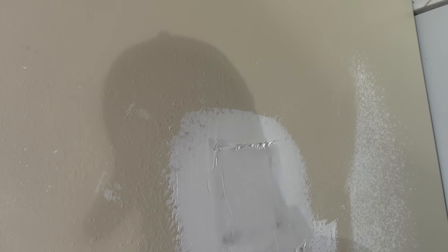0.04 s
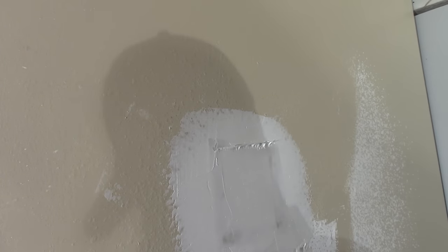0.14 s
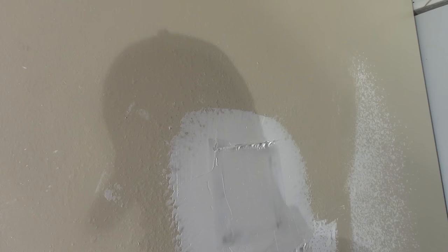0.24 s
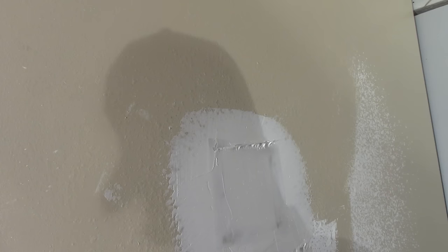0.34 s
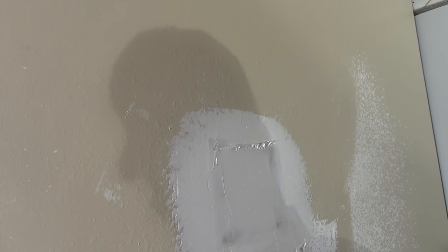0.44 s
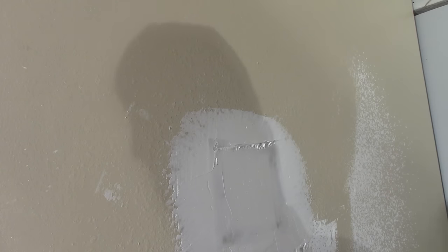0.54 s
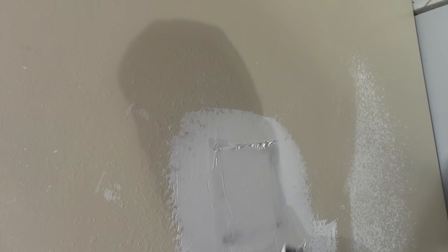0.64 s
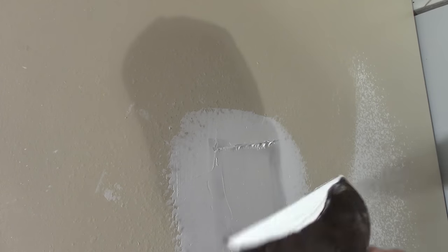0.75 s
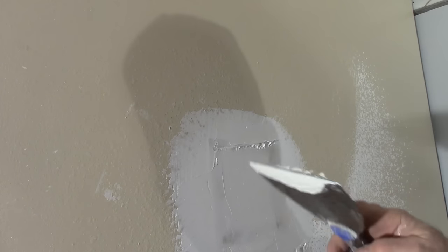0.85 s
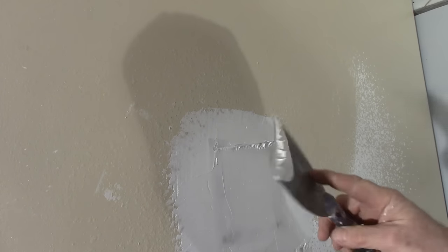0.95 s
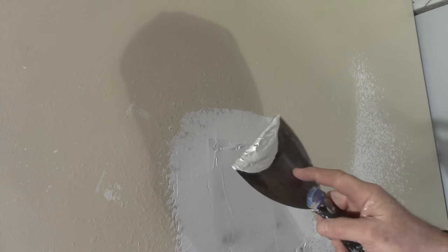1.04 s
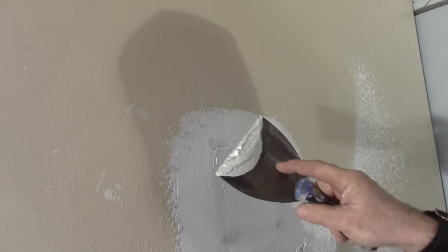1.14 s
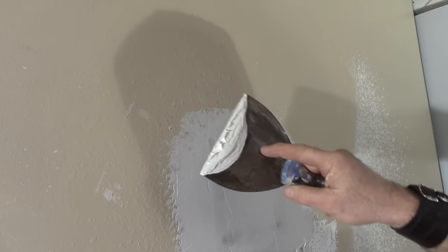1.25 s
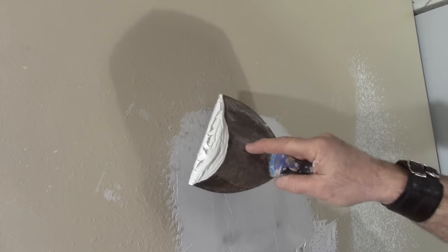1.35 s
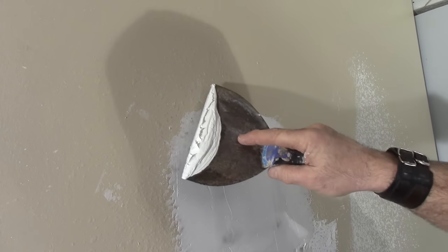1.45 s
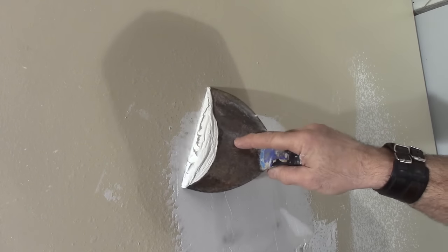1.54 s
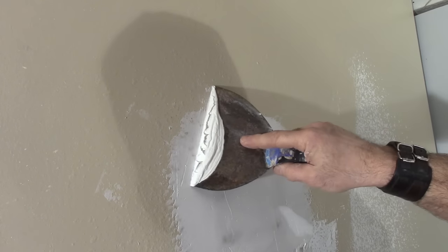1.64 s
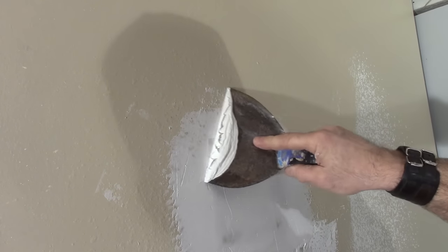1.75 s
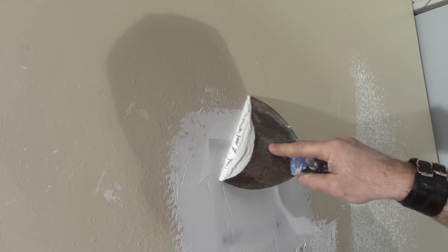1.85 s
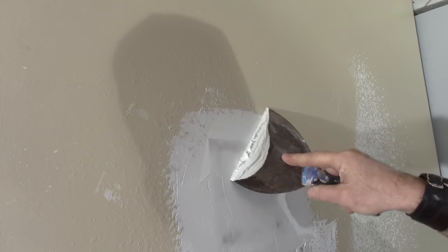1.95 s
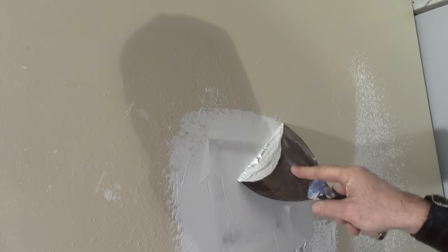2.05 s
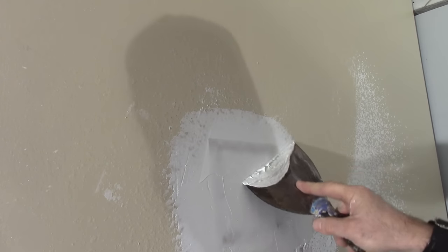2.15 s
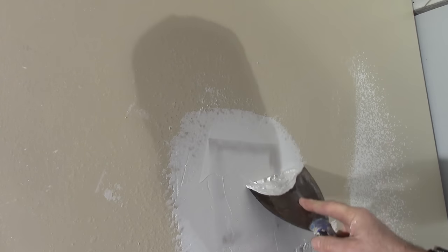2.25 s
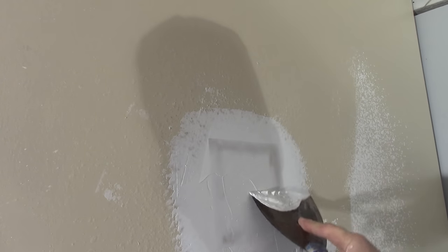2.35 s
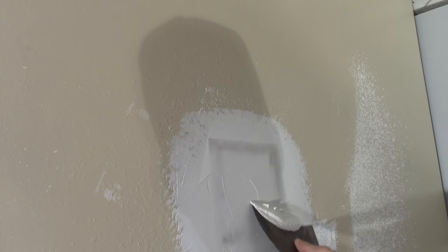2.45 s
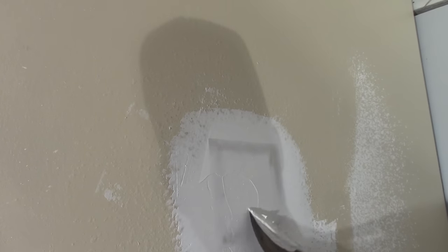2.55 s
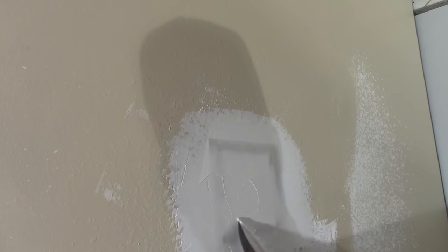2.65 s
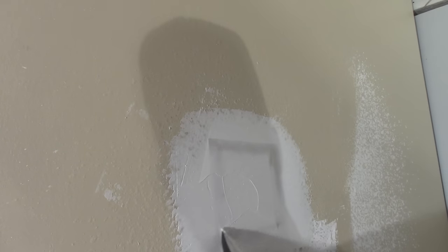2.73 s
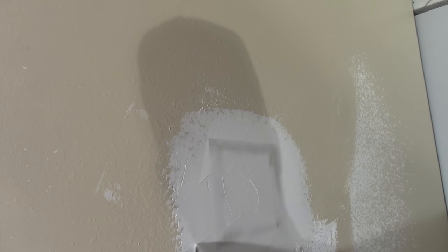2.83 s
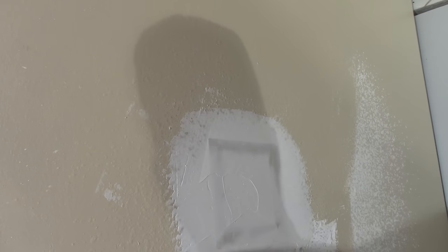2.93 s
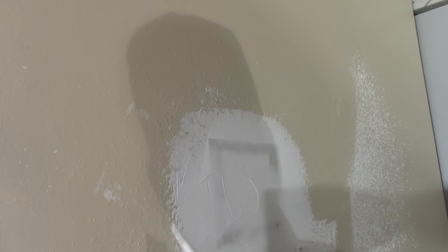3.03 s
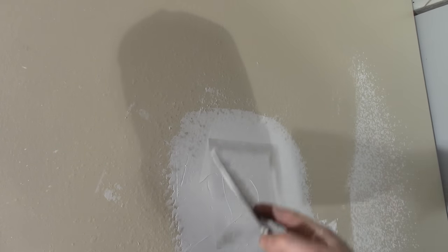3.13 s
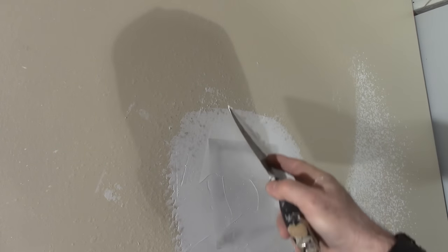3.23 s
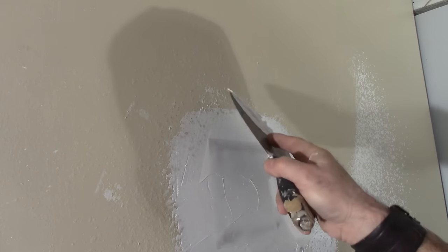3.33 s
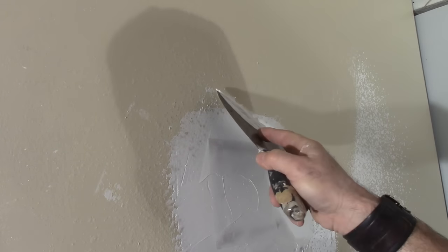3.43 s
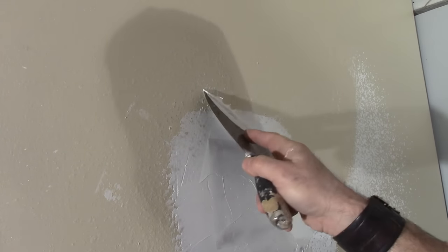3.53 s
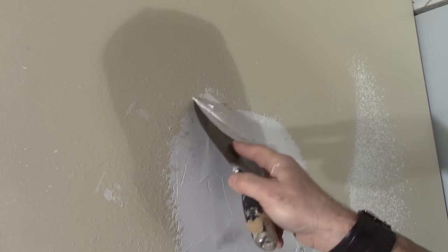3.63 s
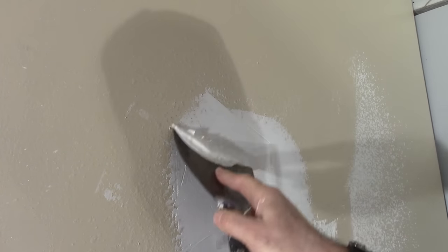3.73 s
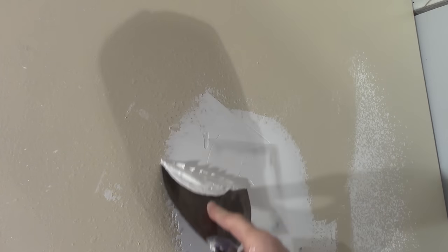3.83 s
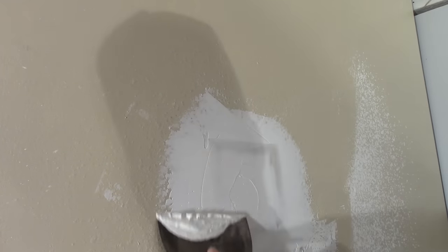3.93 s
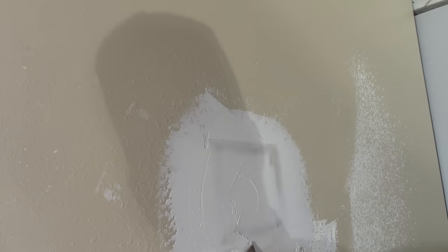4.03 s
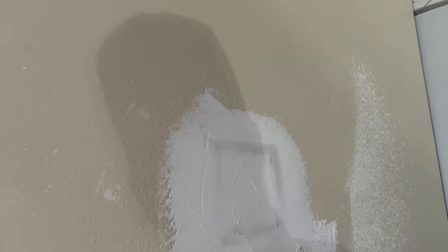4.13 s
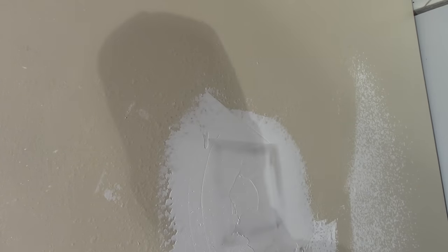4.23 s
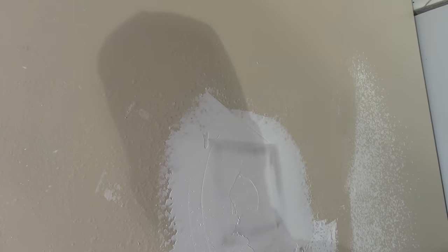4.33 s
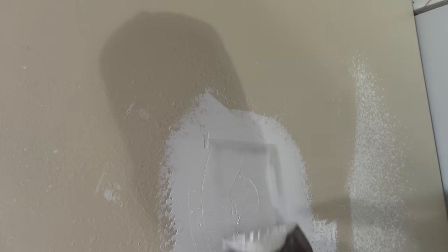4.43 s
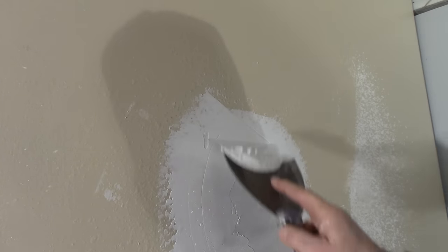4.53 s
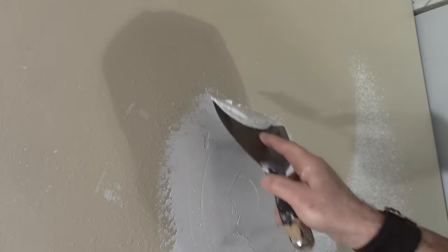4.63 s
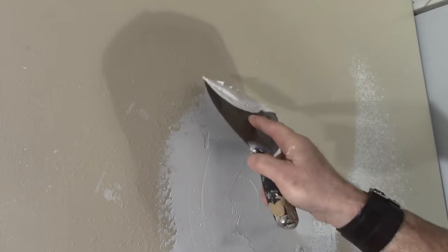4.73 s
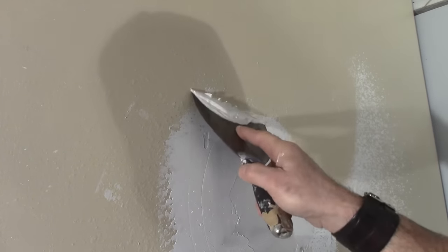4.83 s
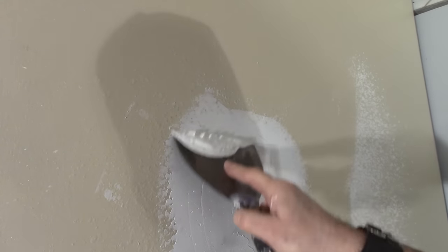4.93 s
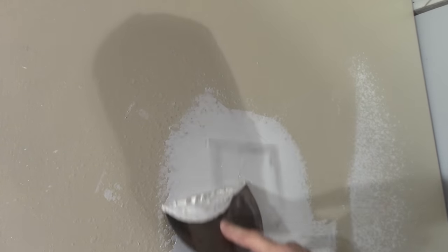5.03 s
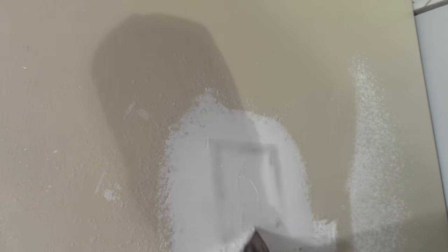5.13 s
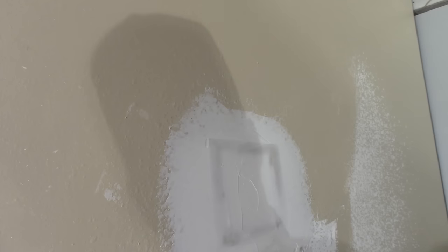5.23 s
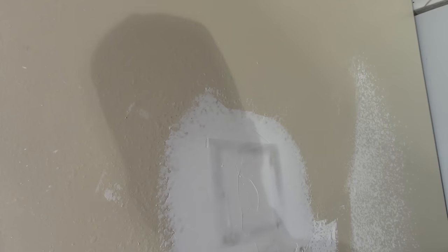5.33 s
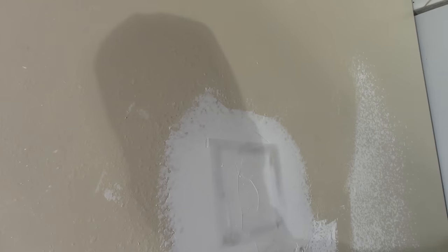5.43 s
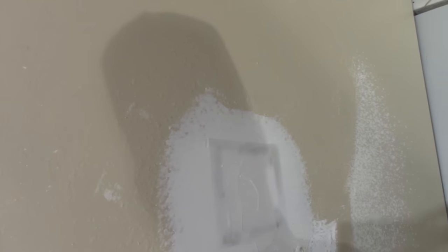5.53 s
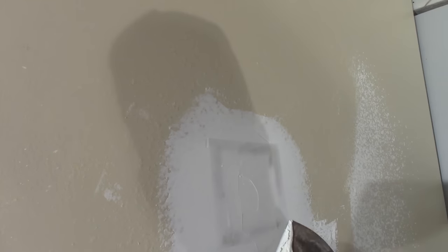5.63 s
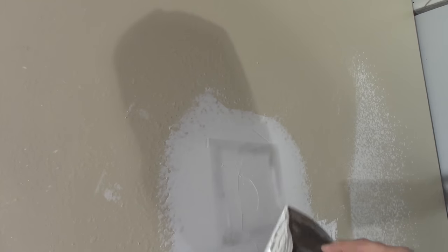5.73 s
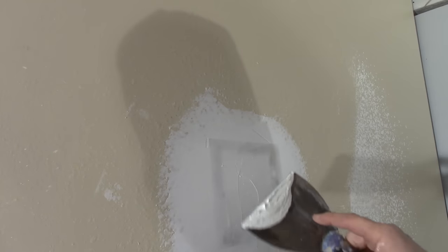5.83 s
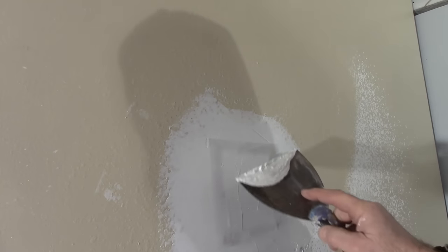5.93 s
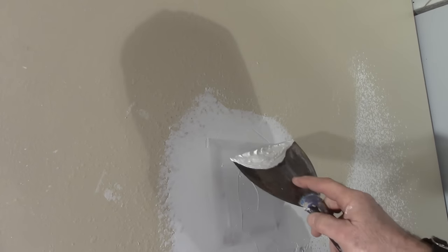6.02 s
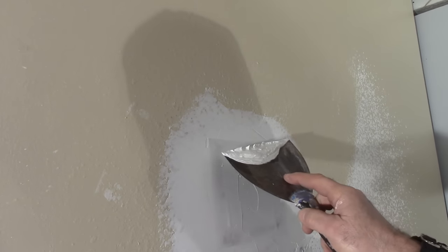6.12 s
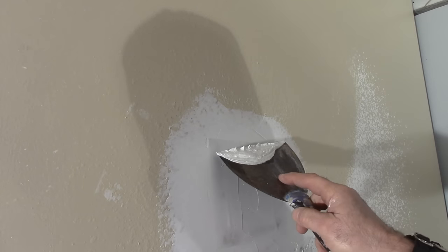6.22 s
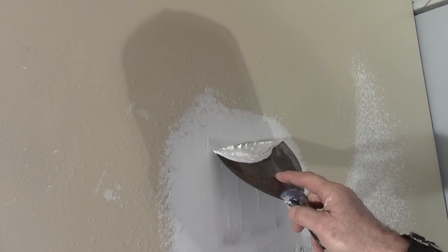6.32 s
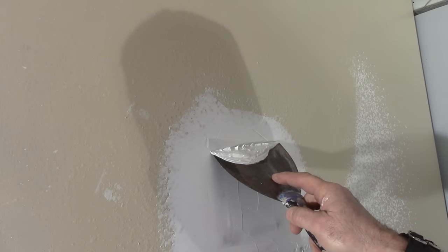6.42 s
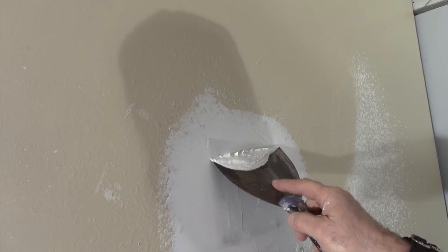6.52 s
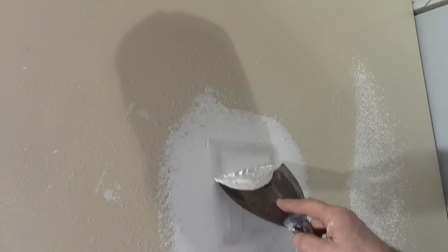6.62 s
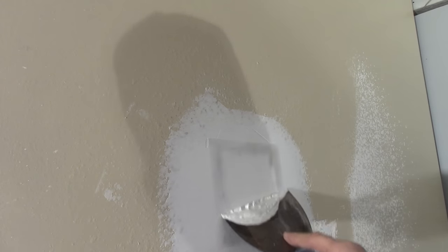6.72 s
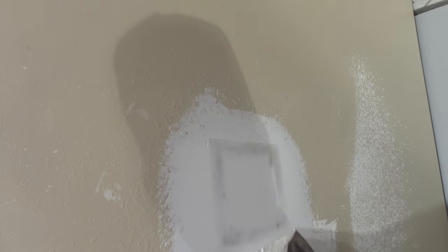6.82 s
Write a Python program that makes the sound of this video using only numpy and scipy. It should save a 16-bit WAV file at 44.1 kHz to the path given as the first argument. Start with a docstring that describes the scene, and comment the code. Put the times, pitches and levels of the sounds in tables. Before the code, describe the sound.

In a bare, lively room, a broad metal filling knife works on a hollow wall board close to the microphone. Quiet tub rubbing leads to a dull landing and several short hissing, ringing scrapes. After a pause, a double knock starts a second group with a thin high squeak; after another, a sharp slap opens a short, harsh final group. Soft wiping and a muffled touch follow, with sound almost centred.

```python
"""A soft wipe and a hollow rub in a tub of filler open the take, over low room noise in a bare room.
Then a wide steel putty knife lands on a hollow plasterboard wall with a knock, for three spells of work:
noise grains hiss through the paste and make the steel sing, and denser ones rasp on the board under pressure.
The edge ticks on grit through the blade's resonances and squeaks in wavering tones; a last soft touch follows.
The microphone is close and nearly mono; filtered noise makes the reverberation and the room noise."""
import sys
import numpy as np
from scipy import signal
from scipy.fft import rfft, irfft, next_fast_len
from scipy.io import wavfile

SR = 44100
rng = np.random.default_rng(int(sys.argv[2]) if len(sys.argv) > 2 else 0)


def wrap_up_sound(samples):
    """Save the sound to the file named by the first command line argument, as 16-bit audio."""
    columns = np.atleast_2d(samples).T
    # keep every value between -1 and 1, then stretch to whole-number steps
    tamed = np.clip(columns, -1, 1)
    steps = np.round(tamed * 32767).astype(np.int16)
    wavfile.write(sys.argv[1], SR, steps)


N = 302967
TIME = np.arange(N) / SR

# modes of the hollow wall board: [f/Hz, relative level/dB, t60/s]
BOARD_MODES = [(60, -23, 0.35), (124.3, -12, 0.14), (184.4, -5.5, 0.057), (252, -12, 0.14),
               (344, -5, 0.054), (402, -3, 0.11), (467, 0.5, 0.039), (544, 1.5, 0.023), (728, -0.5, 0.021),
               (820, 2, 0.014), (1002, -7, 0.028)]


def from_db(db):
    """Decibels to gain."""
    return 10 ** (np.asarray(db) / 20)


def rms_one(x):
    """Scale to unit power."""
    return x / np.sqrt(np.mean(x ** 2) + 1e-20)


def at_hz(points, hz):
    """Read a table on a log-frequency axis."""
    freqs, values = np.transpose(points)
    return np.interp(np.log(np.maximum(hz, 1)), np.log(freqs), values)


def colour(x, spectrum):
    """Give a steady signal a smooth spectrum; rms 1."""
    size = next_fast_len(N)
    bins = rfft(x, size)
    hz = np.arange(len(bins)) * SR / size
    return rms_one(irfft(bins * from_db(at_hz(spectrum, hz)), size)[:N])


def drift(rate):
    """Slow chance with spread 1: noise through two equal one-pole low-passes at the rate in Hz."""
    r = np.exp(-2 * np.pi * rate / SR)
    noise = rng.standard_normal(N + SR)
    # the first second lets the filter settle
    return rms_one(signal.lfilter([1], [1, -2 * r, r * r], noise)[SR:])


def low_pass(x, hz):
    """Gentle second-order roll-off."""
    return signal.sosfilt(signal.butter(2, min(hz, SR / 2 - 1), fs=SR, output="sos"), x + 1e-18)


def high_pass(x, hz):
    """Second-order cut of the bass."""
    return signal.sosfilt(signal.butter(2, hz, "high", fs=SR, output="sos"), x)


def band_pass(x, low, high):
    """Keep what lies between two frequencies in Hz."""
    return signal.sosfilt(signal.butter(2, [low, high], "band", fs=SR, output="sos"), x)


def ring(x, hz, t60):
    """A unit click sets a decaying sine of starting height 1 ringing."""
    r, w = np.exp(-np.log(1000) / (t60 * SR)), 2 * np.pi * hz / SR
    return signal.lfilter([0, np.sin(w)], [1, -2 * r * np.cos(w), r * r], x + 1e-18)


def resonate(x, hz, width):
    """One resonance of the given width in Hz, with gain 1 on top."""
    r = np.exp(-np.pi * width / SR)
    forward = np.array([1, 0, -1]) * (1 - r * r) / 2
    feedback = [1, -2 * r * np.cos(2 * np.pi * hz / SR), r * r]
    return signal.lfilter(forward, feedback, x + 1e-18)


def burst(start, decay_s):
    """Envelope that jumps to 1 and dies away."""
    return (TIME >= start) * np.exp(-np.minimum(np.abs(TIME - start) / decay_s, 20))


def gesture(start, end, attack_s, release_s):
    """Envelope that swells to 1 at the start, holds, and dies away after the end."""
    outside = np.maximum(start - TIME, 0) / attack_s + np.maximum(TIME - end, 0) / release_s
    return np.exp(-np.minimum(outside, 20))


def gestures(rows, attack_s, release_s, axis=2):
    """Gain over time of a table of like gestures, from one of its dB columns."""
    return sum(from_db(row[axis]) * gesture(row[0], row[1], attack_s, release_s) for row in rows)


def slide_gain(axis=2):
    """Strength of the sliding contact over time: hiss from column 2, singing from column 3."""
    # the blade slides through the paste:
    # [start t/s, end t/s, relative hiss level/dB, relative level of the singing steel/dB]
    slide_times = [(1.685, 1.75, -50.5, -32.5), (1.775, 1.985, -47, -32.5), (2.02, 2.10, -52, -51),
                   (2.14, 2.49, -58.5, -55), (2.245, 2.33, -68, -39), (2.60, 2.67, -55.5, -62),
                   (2.72, 2.955, -44, -32), (3.695, 3.795, -45.5, -35), (3.90, 4.15, -50, -35.5),
                   (4.19, 4.31, -44, -25.5), (4.91, 4.99, -45.5, -41), (5.05, 5.25, -47.5, -34),
                   (5.29, 5.355, -39, -23)]
    return gestures(slide_times, attack_s=0.019, release_s=0.017, axis=axis)


def pressure(release_s=0.03):
    """Each press of the hand builds at its own pace and lets go alike."""
    # the edge is pressed onto the board:
    # [full pressure from t/s, until t/s, swell time constant/s, relative rasp level/dB]
    press_times = [(1.948, 2.068, 0.074, -36), (2.707, 2.734, 0.035, -29), (2.794, 2.804, 0.0083, -23),
                   (2.928, 2.972, 0.057, -25.5), (3.763, 3.808, 0.015, -34.5), (4.281, 4.319, 0.059, -18),
                   (4.857, 4.95, 0.011, -21.5), (5.319, 5.356, 0.031, -13)]
    return sum(from_db(db) * gesture(start, end, swell_s, release_s)
               for start, end, swell_s, db in press_times)


def grit(per_s, spread_db, judder_db, judder_rate):
    """Tiny slips of random size and sign at random moments; the judder of the edge swells and fades them."""
    signs = np.sign(rng.standard_normal(N))
    sizes = from_db(spread_db * (2 * rng.random(N) - 1)) * signs
    happens = rng.random(N) < per_s / SR
    return sizes * happens * from_db(judder_db * np.tanh(drift(judder_rate)))


def blade(x, wander_db=4, wander_rate=9):
    """The steel's damped resonances; each swells and fades a little as the point of contact shifts."""
    # resonances of the steel blade: [f/Hz, width/Hz, relative level/dB]
    steel_modes = [(1270, 74, -3), (2255, 110, -3.5), (2700, 560, 0), (3250, 210, -3.5), (3690, 260, -2.5),
                   (4200, 130, -3), (4680, 103, -15), (7140, 300, -15), (2750, 40, 0), (3660, 70, -13),
                   (4900, 54, 0.5)]
    out = np.zeros(N)
    for hz, width, db in steel_modes:
        wander = wander_db * np.tanh(drift(wander_rate))
        out += from_db(db + wander) * resonate(x, hz, width)
    return out


def sliding(slide, press, steel_db=-5, stroke_db=11, unsteady_db=-1.0, unsteady_rate=14):
    """Fine grains in the paste pass under the blade and make it sing."""
    # hiss of the wet paste: [f/Hz, relative density level/dB]
    hiss_spectrum = [(59, -49), (100, -14.5), (249, -1.5), (364, -0.5), (511, -0.5), (732, -5), (905, -0.5),
                     (1140, -9), (1300, -3), (2350, -8.5), (2720, -6), (3030, -8), (3300, -8.5),
                     (10100, -23.5), (15800, -35)]
    # light wiping of the paste: [start t/s, end t/s, hiss level/dB]
    wipe_times = [(.39, .52, -55), (.79, .81, -46.5), (.91, 1.25, -53.5), (1.06, 1.10, -50),
                  (5.735, 5.75, -51), (6.60, 6.71, -46.5), (6.86, 6.87, -42.5)]
    # pressure also raises the hiss and the singing
    press_hiss_db, press_singing_db = -29, -15
    slips = grit(per_s=4000, spread_db=5.5, judder_db=4.0, judder_rate=49)
    strokes = from_db(stroke_db) * (slide + from_db(press_hiss_db) * press)
    wipes = gestures(wipe_times, attack_s=0.024, release_s=0.039)
    hiss = colour(slips, hiss_spectrum) * (strokes + wipes)
    singing_gain = from_db(steel_db) * (slide_gain(axis=3) + from_db(press_singing_db) * press)
    singing = rms_one(blade(slips)) * singing_gain
    return (hiss + singing) * from_db(unsteady_db * np.tanh(drift(unsteady_rate)))


def rasping(slide, press, rasp_db=-1, board_db=-15, slide_rasp_db=2):
    """Under pressure the bare edge stutters densely over the wall and shakes the board; slides rasp too."""
    # rasp of the edge on the board: [f/Hz, relative density level/dB]
    rasp_spectrum = [(50, -43), (90, -32), (140, -13.5), (280, -6), (420, 0.5), (650, -9), (950, 0),
                     (1800, 5), (2300, -1), (3000, -1), (4800, -7), (6000, -17), (9000, -44), (15800, -51)]
    slips = grit(per_s=12000, spread_db=5, judder_db=4.5, judder_rate=84)
    board = np.zeros(N)
    for hz, db, t60 in BOARD_MODES:
        width = np.log(1000) / (np.pi * t60)
        board += from_db(db) * resonate(slips, hz, width)
    voice = colour(slips, rasp_spectrum) + from_db(board_db) * rms_one(board)
    return from_db(rasp_db) * voice * np.hypot(press, from_db(slide_rasp_db) * slide)


def landings(slap_s=0.013, push_s=0.012, rattle_db=-25, knock_db=19, ring_db=-5):
    """The blade claps flat on the wall, and the hollow board knocks and thuds."""
    # blade meets wall: [t/s, relative thud level/dB, relative slap level/dB, low-pass of the contact f/Hz]
    landing_times = [(0.789, -34, -48, 5000), (1.579, -18.5, -29.5, 2030), (2.029, -29, -20.5, 1430),
                     (2.941, -20.5, -37, 298), (3.551, -23, -31.5, 3520), (3.573, -15.5, -24, 1490),
                     (4.8245, -11, -1.5, 6200), (6.453, -22, -28, 600)]
    # slap of the flat steel: [f/Hz, relative density level/dB]
    slap_spectrum = [(30, -47), (70, -28), (130, -28), (280, -26), (430, -2.5), (800, 0), (1200, -8.5),
                     (1800, 0), (2600, -2.5), (4400, -10.5), (6000, -18), (9000, -21), (15800, -16)]
    # after each landing the blade settles flat with a duller push
    settle_s, settle_db, settle_hz = 0.021, -2.5, 220
    clap = colour(rng.standard_normal(N), slap_spectrum)
    rattle = from_db(rattle_db) * rng.standard_normal(N)
    slaps, pushes = np.zeros(N), np.zeros(N)

    def push(s):
        """A click with a short rattle after it."""
        return signal.unit_impulse(N, round(s * SR)) + rattle * burst(s, push_s)

    for s, thud_db, slap_db, bright_hz in landing_times:
        # a soft contact passes only the lows
        pushes += from_db(thud_db) * low_pass(push(s), bright_hz)
        pushes += from_db(thud_db + settle_db) * low_pass(push(s + settle_s), settle_hz)
        slaps += from_db(slap_db) * low_pass(clap * burst(s, slap_s), bright_hz)
    knock = from_db(knock_db) * resonate(pushes, hz=600, width=1300)
    thud = np.zeros(N)
    for k, (hz, db, t60) in enumerate(BOARD_MODES):
        # neighbouring modes move in opposite senses
        thud += (-1) ** k * from_db(db) * ring(pushes, hz, t60)
    # the board radiates the deep bass poorly
    return slaps + high_pass(knock + from_db(ring_db) * thud, 80)


def catches(slide, catch_db=-5, crack_db=-2, decay_s=0.002):
    """A grain snaps free: a crack, and the blade rings."""
    # the edge catches on coarse grit: [t/s, relative level/dB]
    catch_times = [(0.7893, -32.5), (1.82, -21.5), (1.868, -29), (1.934, -27), (1.954, -29), (1.9865, -30),
                   (2.2513, -37), (2.4922, -45), (2.59, -31.5), (2.6377, -37), (2.7911, -34), (2.943, -25),
                   (3.684, -38), (4.098, -23), (4.99, -20.5), (5.1244, -23), (5.2415, -29)]
    # finer grit comes by chance during a slide; its level is against the slide gain
    grit_per_s, grit_db, grit_spread_db = 26, 10.5, 5
    happens = rng.random(N) < grit_per_s / SR
    grains = happens * slide * from_db(grit_db + grit_spread_db * rng.uniform(-1, 1, N))
    fine = signal.lfilter([1], [1, -np.exp(-1 / (decay_s * SR))], grains + 1e-18)
    coarse = sum(from_db(db) * burst(s, decay_s) for s, db in catch_times)
    snaps = rng.standard_normal(N) * (fine + coarse)
    return from_db(catch_db) * (4 * blade(snaps) + from_db(crack_db) * low_pass(snaps, hz=8650))


def squeaks(waver=0.043, rough_db=4, waver_rate=236, rough_rate=160):
    """Stick and slip lock onto one resonance for a moment: a rough, wavering tone."""
    # the edge sticks and squeaks briefly: [centre t/s, half length/s, mean f/Hz, level/dB before roughness]
    squeak_times = [(2.373, 0.025, 1382, -38), (2.54, 0.016, 1110, -38), (2.795, 0.014, 1400, -25.5),
                    (4.214, 0.046, 4910, -34), (5.126, 0.0037, 2780, -20), (5.153, 0.014, 2800, -25.5),
                    (5.15, 0.011, 3810, -28), (5.245, 0.003, 3880, -22)]
    phase = 2 * np.pi * np.cumsum(1 + waver * drift(waver_rate)) / SR
    tones = np.zeros(N)
    for s, half_s, hz, db in squeak_times:
        swell = np.exp(-np.minimum(((TIME - s) / half_s) ** 2, 20))
        tones += from_db(db) * swell * np.sin(hz * phase)
    return tones * from_db(rough_db * drift(rough_rate))


def scooping(scoop_db=-3):
    """The blade scoops filler from its tub: slips coloured to a soft, hollow rub."""
    # scoops from the tub: [start t/s, end t/s, relative level/dB]
    scoop_times = [(.38, .49, -46.5), (.60, .64, -48.5), (.77, .80, -47)]
    # hollow sound of the tub: [f/Hz, relative density level/dB]
    tub_spectrum = [(410, -31), (700, -19), (917, -9), (1160, 3), (1670, -6), (1820, -17), (4150, -17),
                    (6000, -24), (7800, -60), (13200, -120)]
    slips = grit(per_s=3000, spread_db=7, judder_db=6, judder_rate=29)
    strength = gestures(scoop_times, attack_s=0.035, release_s=0.02)
    return from_db(scoop_db) * colour(slips, tub_spectrum) * strength


def room(x, first_echo_s=0.004):
    """Dense reflections from bare walls, as decaying noise in bands; the top treble dies first."""
    # decay of the room: [f/Hz, t60/s]
    decay_times = [(100, 0.62), (700, 0.56), (2000, 0.57), (5000, 0.61), (9000, 0.43), (15000, .16)]
    # reverberation against the sound sent into the room: [f/Hz, level/dB]
    echo_levels = [(100, -0.5), (1500, -2.5), (4500, -9.5), (8000, -6), (15000, -40)]
    t, response = TIME[:SR], np.zeros(SR)
    edges = np.geomspace(50, 16000, 13)
    for low, high in zip(edges, edges[1:]):
        hz = np.sqrt(low * high)
        band = band_pass(rng.standard_normal(SR), low, high)
        decay = np.exp(-np.log(1000) * t / at_hz(decay_times, hz))
        tail = band * decay * (t > first_echo_s)
        # each band gets energy in proportion to its width
        response += from_db(at_hz(echo_levels, hz)) * rms_one(tail) * np.sqrt(2 * (high - low)) / SR
    return signal.fftconvolve(x, response)[:N]


def ambience(level_db=-48):
    """Low, steady rush of the room: coloured noise."""
    # room noise: [f/Hz, relative density level/dB]
    noise_spectrum = [(15, -74), (25, -24), (107, -8.5), (148, -5), (269, -4.5), (307, -4), (437, -5),
                      (557, -7), (620, -7), (769, -7.5), (1010, -13), (1090, -14), (1510, -18),
                      (5670, -30.5), (15800, -44)]
    return colour(rng.standard_normal(N), noise_spectrum) * from_db(level_db)


def scene(knife_db=-2.0, bass_side_db=-23, treble_side_db=-16, ambience_side_db=-11):
    """The knife is straight ahead; only the echoes and the room noise differ between the sides."""
    slide, press = slide_gain(), pressure()
    strokes = sliding(slide, press) + rasping(slide, press)
    contacts = landings() + catches(slide) + squeaks() + scooping()
    knife = from_db(knife_db) * (strokes + contacts)
    treble = band_pass(knife, 2300, 11000)
    mid = knife + room(knife) + ambience()
    side_echoes = room(from_db(bass_side_db) * knife + from_db(treble_side_db) * treble)
    side = side_echoes + from_db(ambience_side_db) * ambience()
    return np.array([mid + side, mid - side])


def record(dry):
    """The microphone sheds the deep bass, peaks are rounded, the top is cut."""
    thinned = high_pass(dry, 55)
    rounded = 1.255 * np.tanh(thinned / 1.365)
    top_cut = signal.ellip(10, 0.1, 80, 15850, fs=SR, output="sos")
    return signal.sosfilt(top_cut, rounded)


dry = scene()
out = record(dry)
wrap_up_sound(out)
```